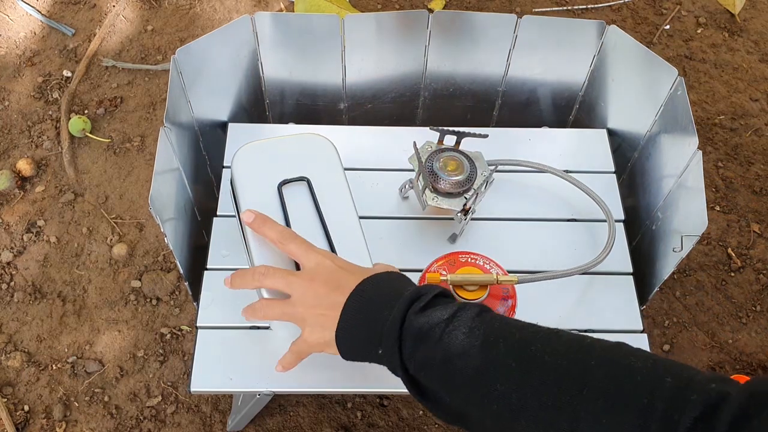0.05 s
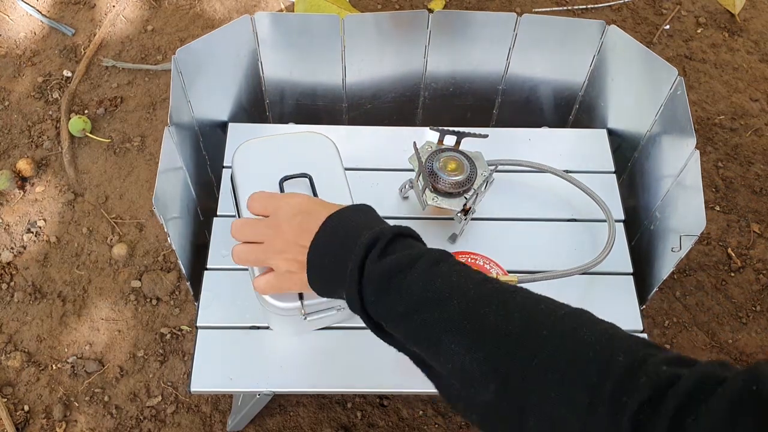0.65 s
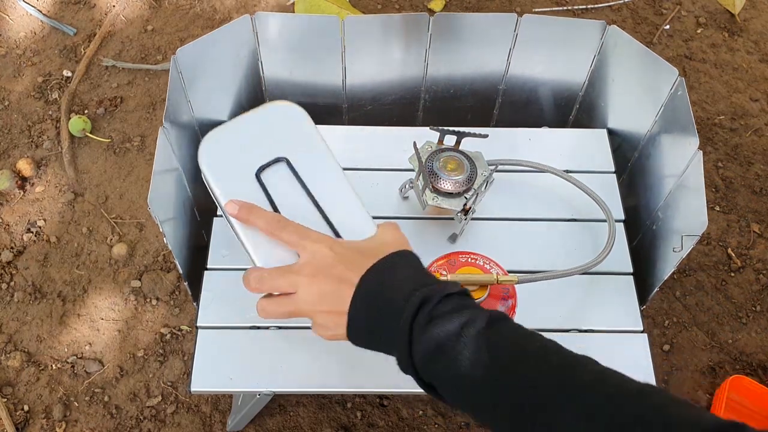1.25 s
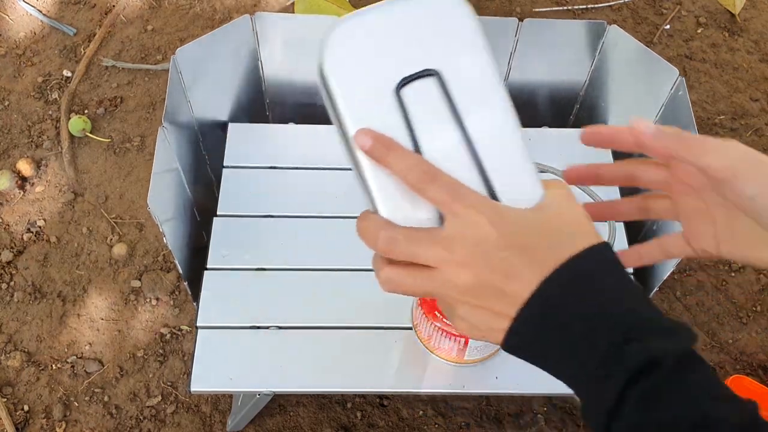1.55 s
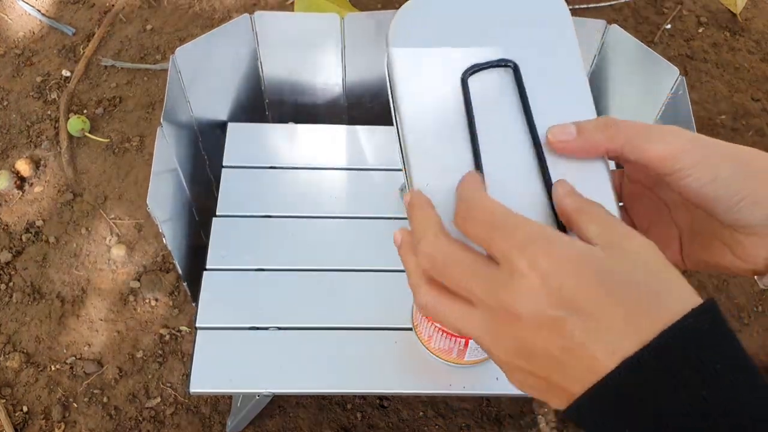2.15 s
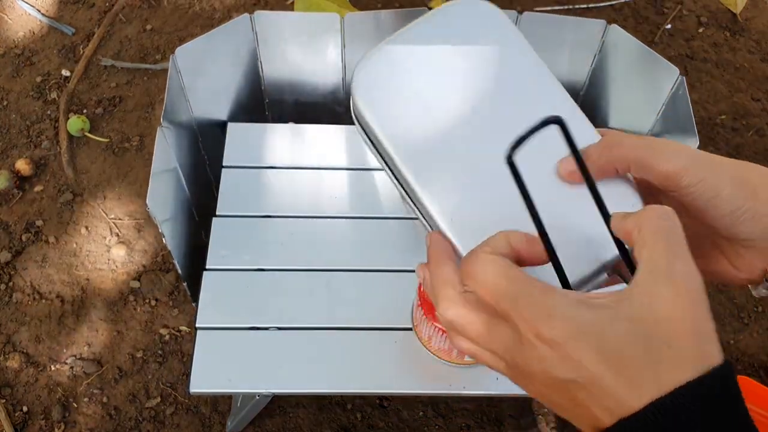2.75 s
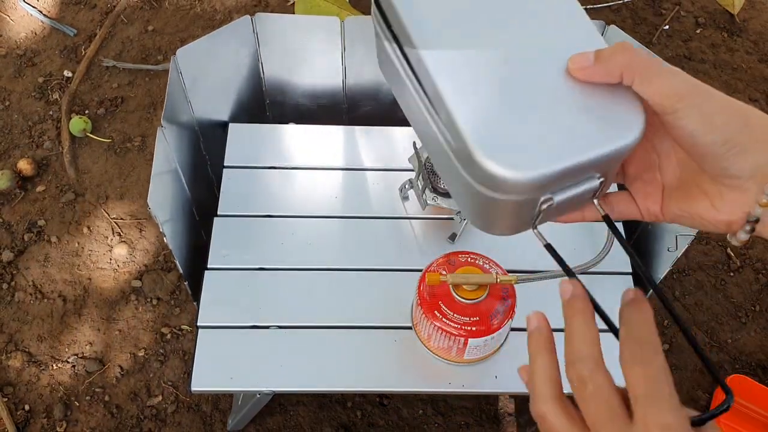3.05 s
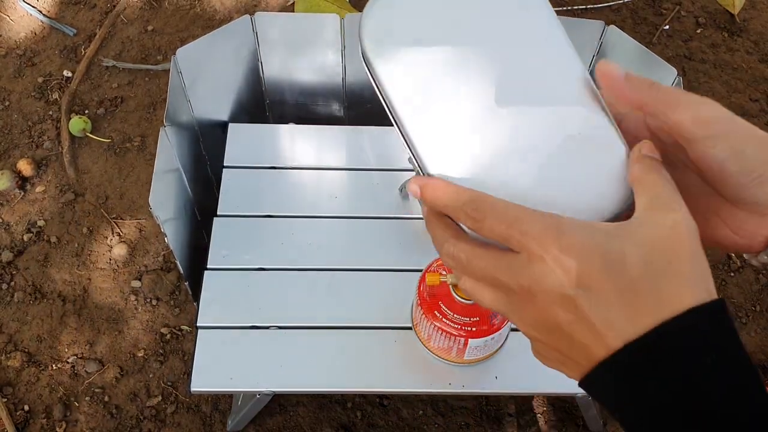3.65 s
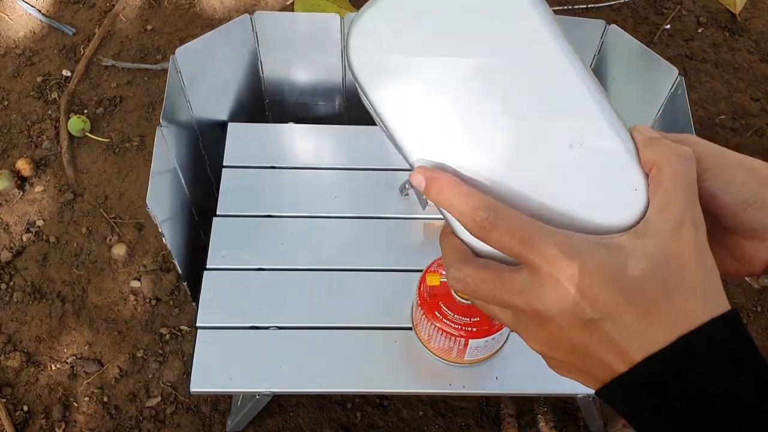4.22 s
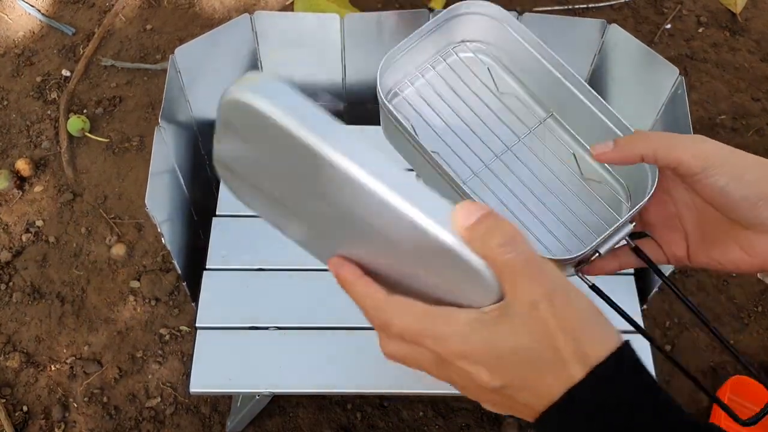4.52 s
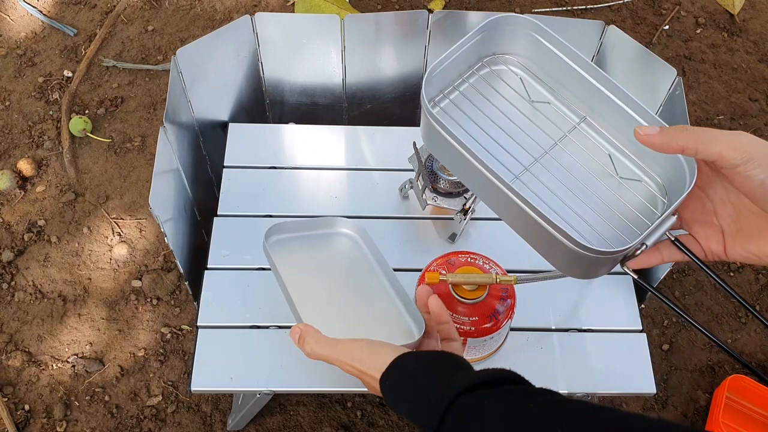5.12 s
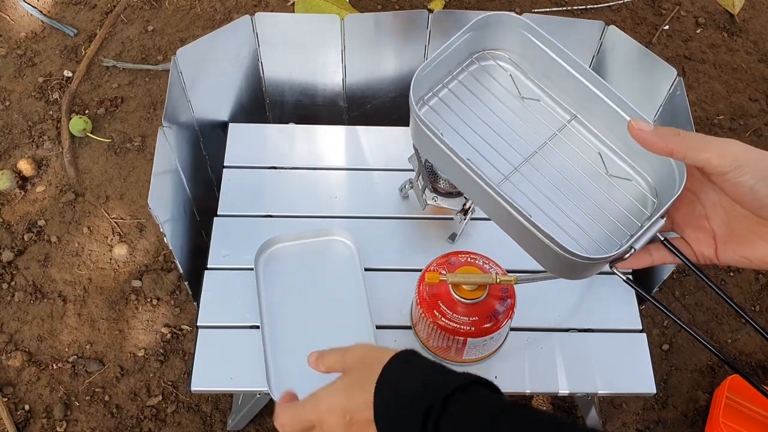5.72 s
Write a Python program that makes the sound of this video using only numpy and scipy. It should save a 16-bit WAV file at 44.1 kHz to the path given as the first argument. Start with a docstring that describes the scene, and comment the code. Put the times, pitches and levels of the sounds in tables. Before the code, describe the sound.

Light wind buffets the microphone in a quiet outdoor spot while an aluminium tin is handled up close. It scrapes and knocks on a metal camp table, then its wire handle clinks and squeaks open. The lid comes off with a squeaky, ringing scrape. After a short pause, the lid clatters onto the table and slides a little before it settles.

```python
"""A mess tin on a camp table

Outdoors, close by, an aluminium mess tin is slid and lifted off a slatted metal table. Its wire
handle is unlatched and swung open, then the lid is pulled off and set down with a clatter.
Knocks and tiny slips make the thin metal ring, and rubbing makes it squeak.
Light wind buffets the microphone over a soft outdoor hush."""
import sys
import numpy as np
from scipy import signal
from scipy.fft import rfft, irfft, next_fast_len
from scipy.io import wavfile
from scipy.ndimage import uniform_filter1d

SR = 44100
rng = np.random.default_rng(int(sys.argv[2]) if len(sys.argv) > 2 else 0)


def unload_audio(sound):
    """Save the sound as a 16-bit wav file, at the path given as the first command line argument."""
    columns = np.transpose(np.atleast_2d(sound))
    # keep every value between -1 and 1, then stretch to whole-number steps
    steps = np.round(np.clip(columns, -1, 1) * 32767)
    wavfile.write(sys.argv[1], SR, steps.astype(np.int16))


N = 259308


def amp(db):
    """Turn decibels (dB) into a number to multiply by."""
    return 10 ** (np.asarray(db) / 20)


def unit(x):
    """Scale a sound so that its average level (rms) is 1."""
    return x / np.sqrt(np.mean(x ** 2) + 1e-20)


def curve(rows):
    """Join (seconds, value) points with straight lines, giving one value per sample."""
    seconds, values = np.transpose(rows)
    return np.interp(np.arange(N) / SR, seconds, values)


def filtered(x, response):
    """Multiply each frequency in a sound by the gain that response gives for it."""
    size = next_fast_len(len(x) + 8192)
    gains = response(np.fft.rfftfreq(size, 1 / SR))
    return irfft(rfft(x, size) * gains, size)[:len(x)]


def noise(spectrum, size):
    """Noise with an average level of 1, shaped by (Hz, dB) points."""
    points_hz, db = np.transpose(spectrum)
    white = rng.standard_normal(size)
    return unit(filtered(white, lambda hz: amp(np.interp(np.log(hz + 1), np.log(points_hz), db))))


def envelope(x, seconds):
    """Follow a sound's level, averaged over a short stretch of time."""
    power = uniform_filter1d(x * x, max(int(seconds * SR), 1), mode="constant")
    return np.sqrt(np.abs(power) + 1e-20)


def add(track, x, seconds):
    """Mix a sound into the track, starting at the given time."""
    start = max(round(seconds * SR), 0)
    track[start:start + len(x)] += x[:max(N - start, 0)]


def hush(gain_db=4):
    """The soft background of open air and trees."""
    # Each row: time in seconds, relative level in dB.
    levels = [(0.0, -49), (2.29, -51), (3.11, -47), (3.5, -53), (5.21, -55.5), (5.55, -47.5), (5.88, -56)]
    # Each row: frequency in Hz, relative level in dB.
    spectrum = [(80, -3.5), (150, 4), (300, -4.5), (560, -4.5), (900, -8), (1600, -9), (3000, -15),
                (5500, -19), (7500, -24.5), (10000, -31.5), (12000, -41), (16000, -50)]
    return amp(curve(levels) + gain_db) * noise(spectrum, N)


def wind(breeze_gain_db=-1, flutter_base_db=-37.5, flutter_growth=0.53, reference_db=-30):
    """Wind hits the microphone with slow buffets and a faster flutter that grows less in gusts."""
    # The breeze between gusts. Each row: time in seconds, relative strength in dB.
    breeze = [(0.0, -35.5), (0.3, -35), (0.57, -28.5), (0.68, -34), (1.35, -28.5), (1.61, -38.5),
              (1.92, -47), (2.02, -27), (2.5, -30.5), (2.8, -41), (3.0, -36), (3.65, -33), (3.95, -48),
              (4.35, -43.5), (4.9, -52.5), (5.12, -42.5), (5.45, -49.5), (5.88, -42.5)]
    # Each row: time of the gust's peak in seconds, half length in seconds, strength in dB.
    gusts = [(0.439, 0.028, -22.5), (0.867, .025, -26.5), (1.044, 0.043, -19), (1.233, 0.043, -29),
             (1.495, 0.023, -25.5), (1.744, 0.046, -20), (2.115, 0.031, -21), (2.353, 0.038, -21.5),
             (3.09, 0.032, -28), (3.284, 0.045, -28), (3.556, 0.015, -23.5), (5.7, 0.064, -34.5)]
    # The tone of the two rumbles. Each row: frequency in Hz, relative level in dB.
    buffet_spectrum = [(12, -24), (25, 0.5), (45, 5), (65, -1), (90, -9), (160, -46), (400, -100)]
    flutter_spectrum = [(40, -26), (65, 3.5), (85, 0.5), (125, -2.5), (200, -18), (320, -25), (700, -51.5),
                        (2000, -79)]
    t = np.arange(N) / SR
    power = amp(curve(breeze) + breeze_gain_db) ** 2
    for peak_s, half_s, db in gusts:
        power += (amp(db) * np.exp(-((t - peak_s) / half_s) ** 2 / 2)) ** 2
    strength_db = 10 * np.log10(power)
    flutter_db = flutter_base_db + flutter_growth * (strength_db - reference_db)
    eddies = [noise(spectrum, N) for spectrum in (buffet_spectrum, flutter_spectrum)]
    buffet, flutter = [x / envelope(x, seconds=0.095) for x in eddies]  # even out chance swells
    return amp(strength_db) * buffet + amp(flutter_db) * flutter


def aluminium(at_s, ring_gain_db=0, scatter_db=2, tail_db=-25, tail_s=0.29):
    """Thin metal answers one touch with clear tones over a short clatter of crowded ones."""
    # The clear tones. Each row: pitch in Hz, relative level in dB, seconds to fade by 60 dB.
    resting = [(560, 10, 0.084), (689, 10, 0.036), (824, -40, 0.041), (1104, -2, 0.091), (1640, -23, 0.039),
               (1634, 0.5, 0.089), (1930, -8, 0.1), (2050, 0.5, 0.077), (2350, -2, 0.076),
               (2715, -12.5, 0.079)]  # the closed tin on the table
    gripped = [(411, 1.5, 0.12), (566, -4, .08), (700, -15, 0.081), (823, -4, 0.055), (1020, -17, 0.34),
               (1324, 0.5, 0.088), (1500, -3, 0.042), (1970, -13, 0.086), (2860, -18, 0.085)]  # the closed tin in both hands
    held = [(380, -3.5, 0.14), (648.4, -2, 0.16), (870, 7, 0.074), (822, -20, 0.94), (995, -19, 0.86),
            (1277, 2, 0.11), (1320, 1, 0.082), (1407, -9, 0.43), (2013, 0.5, 0.062), (2130, -3, 0.073),
            (2336, 3.5, 0.099), (2440, -16, 0.4), (2996, 0, 0.067), (3300, -1, 0.067), (3420, -17, 0.14),
            (3354, -9, .14), (4130, -10, 0.18), (4710, -14, .18), (5670, -4, 0.084), (7840, -18, 0.13)]  # the tin in the air, with its wire handle
    parting = [(570, -12, 0.11), (625, 2.5, 0.13), (664, -11, 0.55), (744, 7.5, 0.092), (830, -11.5, 1),
               (850, 6, 0.081), (1265, 1.5, 0.087), (1350, 5, 0.13), (1865, -7.5, 0.12), (2400, -4, 0.06),
               (2510, -29, .6), (3300, -9, .06), (3770, -24, 0.12), (4290, -11, 0.11), (4850, -13, 0.17)]  # pan and lid as their rims part
    tipped = [(403.5, -10, 0.046), (577, -26, 0.033), (1016, -18, 0.066), (1400, -8, 0.22), (2010, 9, 0.11),
              (2170, 11, 0.051), (3780, -11, 0.057), (4250, -4, 0.059)]  # the lid as one corner touches the table
    lid = [(404, -5.5, 0.11), (439, 4.5, 0.047), (516, -18, 0.041), (629.5, -3, 0.11), (948, -4.5, 0.082),
           (1470, -2, 0.11), (1840, -4, 0.33), (1947, 6, 0.11), (2043, 7, 0.094), (2276, -15, 0.083),
           (2340, -1, 0.13), (2570, -11, 0.22), (2840, -29, 0.18), (2810, -7, 0.24), (3080, -0.5, 0.14),
           (3350, -2.5, 0.11), (3540, -6, 0.19), (3660, -26, 0.18), (4400, -1, 0.088), (4650, -6, 0.12),
           (4600, -15, 0.07), (5470, -15, 0.18), (5430, -20, 0.12)]  # the loose lid on the slats
    # The matching clatter. Each row: frequency in Hz, relative level in dB.
    resting_clatter = [(300, -30), (440, -31), (545, 7), (730, -6), (930, -6.5), (1200, -15), (2000, -9.5),
                       (3000, -16.5), (4200, -17), (5400, -16.5), (6500, -29), (9700, -26.5), (12000, -36),
                       (15500, -61)]
    gripped_clatter = [(300, -47), (420, 0), (800, 1), (1100, -14), (2000, -8), (3300, -7.5), (5000, -14.5),
                       (6500, -27), (8500, -21.5), (12500, -36), (15500, -60)]
    held_clatter = [(280, -34), (367, 0.5), (450, -8.5), (840, -3.5), (1080, -31), (1310, 0.5),
                    (1600, -9.5), (2320, -6.5), (3300, -10), (3900, -14), (6200, -16.5), (9300, -10.5),
                    (11200, -13.5), (15500, -32)]
    parting_clatter = [(260, -62), (450, -46), (607, 5.5), (856, 2.5), (1100, -21), (1300, -7.5),
                       (1510, -21), (2190, -16), (2400, -15), (3490, -13.5), (4770, -15.5), (6730, -19.5),
                       (8050, -9.5), (11700, -19), (16000, -34)]
    lid_clatter = [(250, -37), (400, 13), (620, 0), (800, -10.5), (1150, -3), (1470, 0.5), (1700, 3.5),
                   (2000, 10.5), (3300, 1), (4600, -1.5), (5600, -13), (6600, -23), (9000, -21),
                   (15500, -56)]
    # What is sounding when. Each row: start in seconds, tones, clatter,
    # seconds for the clatter to fade by 60 dB, relative level of the tones in dB.
    stages = [(0, resting, resting_clatter, 0.036, -1.5),
              (2, gripped, gripped_clatter, 0.034, -4),
              (2.7, held, held_clatter, 0.059, -0.5),
              (3.75, parting, parting_clatter, 0.11, -3.5),
              (4.5, tipped, lid_clatter, 0.024, -2.5),
              (5.25, lid, lid_clatter, 0.03, -2.5)]
    begun = [stage for stage in stages if stage[0] <= at_s]
    _, tones, spectrum, clatter_s, tones_db = begun[-1]
    t = np.arange(int(SR * 0.42)) / SR
    fade = lambda seconds: np.exp(-np.log(1000) * t / seconds)
    hz, db, ring_s = np.transpose(tones)[:, :, None]
    strength = amp(db + scatter_db * rng.standard_normal(hz.shape))
    direction = rng.choice([-1, 1], hz.shape)
    ring = np.sum(strength * direction * fade(ring_s) * np.sin(2 * np.pi * hz * t), axis=0)
    clatter = noise(spectrum, len(t)) * (fade(clatter_s) + amp(tail_db) * fade(tail_s))
    return unit(clatter) + amp(tones_db + ring_gain_db) * unit(ring)


def touch_tone(sound, hardness, band_gains_db, cancel_hz=335, knock_hz=1100, edge_hz=5500):
    """A harder touch sounds brighter: it shifts the mix of low knock, middle clank and high edge."""
    # Fingertip, flat sheet, rim and wire.
    # Each row: hardness from 0 to 1, then relative levels of knock, clank and edge in dB.
    touches = [(0, 1, -19, -37), (1 / 3, 0, -7, -19), (2 / 3, -5, 0, -11.5), (1, -10.5, -1, 4)]
    steps, *columns = np.transpose(touches)
    levels_db = np.array([np.interp(hardness, steps, column) for column in columns]) + band_gains_db
    # A small thin sheet gives off no bass, because its two faces cancel each other.
    sound = signal.sosfilt(signal.butter(4, cancel_hz, "high", fs=SR, output="sos"), sound)
    below = lambda hz, corner_hz: 1 / (1 + (hz / corner_hz) ** 8)
    knock = filtered(sound, lambda hz: below(hz, knock_hz))
    clank = filtered(sound, lambda hz: below(hz, edge_hz) - below(hz, knock_hz))
    edge = filtered(sound, lambda hz: 1 - below(hz, edge_hz))
    bands = [band / envelope(band, seconds=0.007).max() for band in (knock, clank, edge)]
    return sum(amp(db) * band for db, band in zip(levels_db, bands))


def scrapes(slips_per_s=500, spread_db=19, grit=0.021, dull_hz=11000):
    """Sliding metal is shaken by a run of tiny uneven slips that swells and fades."""
    # The tin on the slats and in the hands, the hinge, rim against rim, then the lid on the slats.
    # Each row: peak time in seconds, half length in seconds, relative level in dB, hardness from 0 to 1.
    strokes = [ (0.125, 0.048, -33.5, 0.46), (0.155, 0.016, -37.5, 0.93), (0.702, 0.14, -36, 0.47),
               (1.005, 0.097, -38.5, 0.61), (1.104, 0.017, -35.5, 0.84), (1.703, 0.044, -43.5, 0.4),
               (2.231, 0.028, -40, 0.83), (2.399, .02, -25, 0.13), (2.528, 0.097, -37.5, 0.63),
               (2.829, 0.076, -38, 0.3), (2.988, 0.021, -22.5, 0.76), (3.085, 0.036, -29, 0.42),
               (3.218, .02, -26, .85), (3.274, 0.041, -26.5, 0.38), (3.498, 0.074, -48, 0.32),
               (3.9, .05, -34, 0.61), (3.96, .025, -27, 0.49), (5.369, 0.024, -24.5, .6),
               (5.439, .05, -31.5, 0.64), (5.522, .05, -28, .5), (5.601, .028, -24, 0.69),
               (5.681, 0.026, -37, .5)]
    track = np.zeros(N)
    for peak_s, half_s, db, hardness in strokes:
        t = np.arange(-2 * half_s, 2 * half_s, 1 / SR)
        pressure = np.exp(-(t / half_s) ** 2)
        slipping = rng.random(len(t)) < slips_per_s / SR
        slips = slipping * amp(-spread_db * rng.random(len(t)))
        force = pressure * (slips - slips.mean() + grit * rng.standard_normal(len(t)))
        force = filtered(force, lambda hz: 1 / (1 + (hz / dull_hz) ** 2))  # a slip is duller than a blow
        ringing = signal.fftconvolve(force, aluminium(peak_s, ring_gain_db=-3))
        scrape = touch_tone(ringing, hardness, band_gains_db=(-1, -0.5, 0))
        add(track, amp(db) * scrape, peak_s - 2 * half_s)
    return track


def squeaks(waver_per_s=110):
    """Rubbing briefly catches one tone of the metal, which sings unevenly."""
    # Each row: peak time in seconds, half length in seconds, pitch in Hz, level in dB.
    rubs = [(0.168, 0.017, 1970, -42.5), (1.082, 0.005, 2250, -35.5), (2.871, 0.091, 1420, -40.5),
            (3.229, 0.0091, 1313, -18), (3.861, 0.0093, 2080, -37), (3.951, 0.013, 1340, -21),
            (5.322, 0.016, 2420, -36.5), (5.418, .022, 3610, -33.5), (5.433, 0.032, 2800, -38)]
    track = np.zeros(N)
    for peak_s, half_s, hz, db in rubs:
        t = np.arange(-2 * half_s, 2 * half_s, 1 / SR)
        swell = np.exp(-(t / half_s) ** 2)
        drift = np.cumsum(rng.standard_normal(len(t))) * np.sqrt(waver_per_s / SR)
        add(track, amp(db) * swell * np.sin(2 * np.pi * hz * t + drift), peak_s - 2 * half_s)
    return track


def knocks(chatter_s=0.006, bounces=4, bounce_strength=0.97):
    """Each knock is a first touch and a few bounces of the rim within milliseconds."""
    # The tin is shifted and lifted, the handle opens (from 2.8 s), the lid comes off (3.8 s) and is
    # set down (5.2 s). Each row: start in seconds, relative level in dB, hardness from 0 to 1.
    hits = [ (0.212, -42.5, 0.97), (0.296, -34, 0.32), (0.479, -25.5, 0.2), (0.561, -34.5, 0.3),
            (0.687, -34, 0.82), (0.718, -34, 0.91), (0.768, -33, 0.34), (0.929, -30.5, 0.69),
            (0.972, -13.5, .25), (0.975, -18.5, 0.44), (1.194, -36.5, 0.22), (1.71, -32.5, 0.05),
            (2.205, -29.5, 0.22), (2.364, -32, 0.02), (2.379, -29, 0), (2.794, -31, 0.44),
            (2.887, -31.5, 0.46), (2.945, -28.5, 0.76), (2.962, -19.5, 0.83), (2.975, -17, 0.54),
            (3.058, -26, 0.73), (3.191, -18, .4), (3.21, -16, 0.57), (3.224, -16, .66), (3.848, -37.5, 0.4),
            (3.913, -21, 0.31), (3.942, -18.5, 0.39), (3.967, -24.5, 0.44), (5.178, -15, 0.64),
            (5.446, -21, 0.44), (5.512, -23, 0.4), (5.573, -10, 0.63), (5.576, -16.5, 0.78),
            (5.646, -22, 0.59)]
    track = np.zeros(N)
    for start_s, db, hardness in hits:
        force = np.zeros(int(chatter_s * SR) + 2)
        force[0] = 1
        bounce_samples = (rng.random(bounces) * len(force)).astype(int)
        force[bounce_samples] += bounce_strength * rng.uniform(0.43, 1, bounces)
        ringing = signal.fftconvolve(force, aluminium(start_s))
        knock = touch_tone(ringing, hardness, band_gains_db=(-2, -2, -2))
        add(track, amp(db) * knock, start_s)
    return track


def scene():
    """Mix the tin and the outdoor air, the same on the left and the right."""
    mono = knocks() + scrapes() + squeaks() + wind() + hush()
    return np.array([mono, mono])


def record(dry, ceiling=0.9, top_hz=16100):
    """Round off the loudest peaks and remove the very highest treble."""
    rounded = dry / (1 + np.abs(dry / ceiling) ** 6) ** (1 / 6)
    return np.array([filtered(channel, lambda hz: hz < top_hz) for channel in rounded])


dry = scene()
out = record(dry)
unload_audio(out)
```